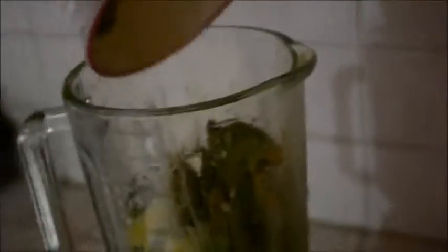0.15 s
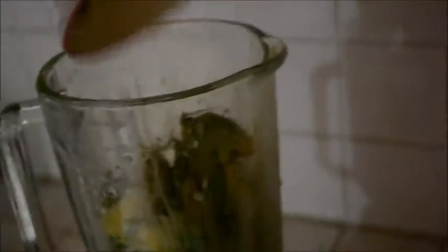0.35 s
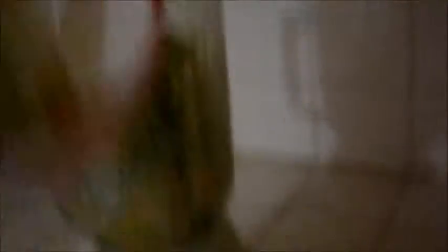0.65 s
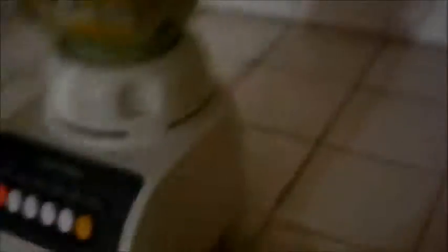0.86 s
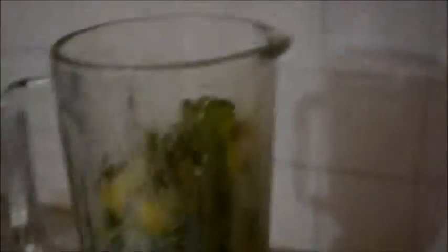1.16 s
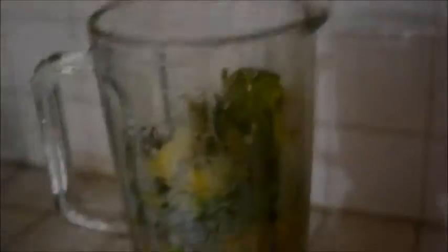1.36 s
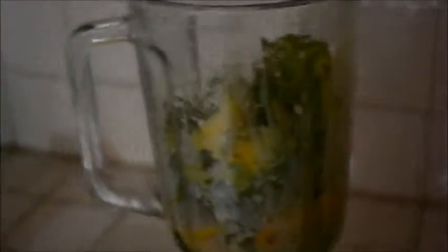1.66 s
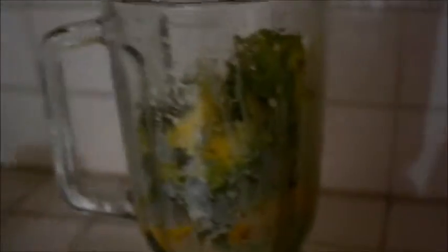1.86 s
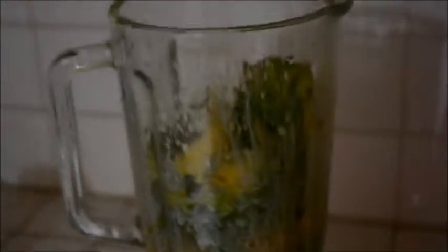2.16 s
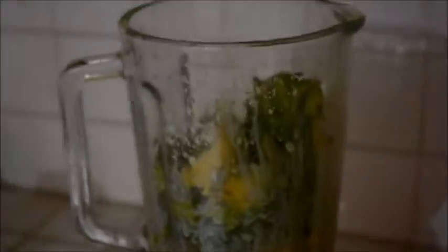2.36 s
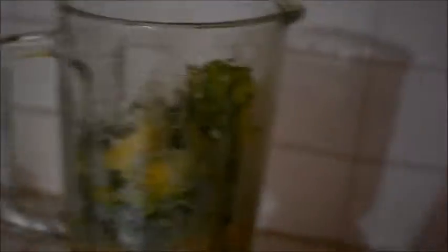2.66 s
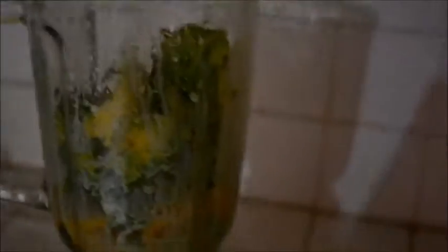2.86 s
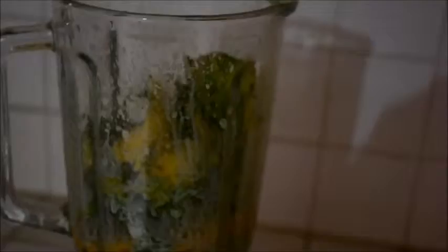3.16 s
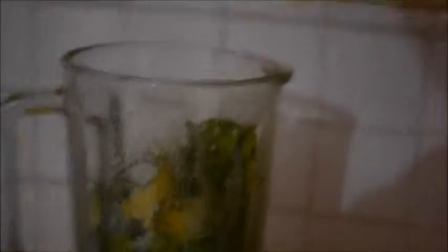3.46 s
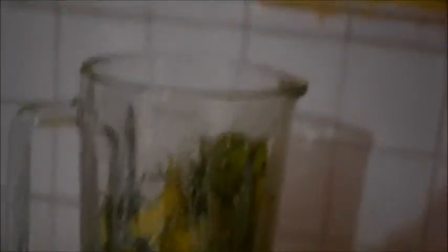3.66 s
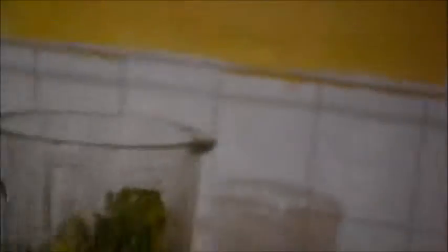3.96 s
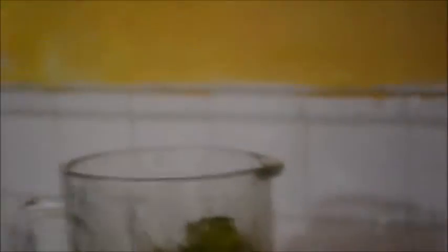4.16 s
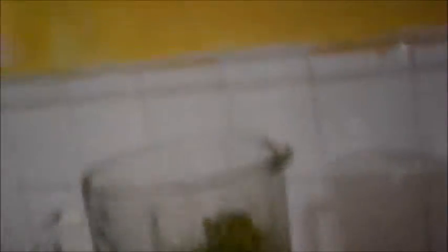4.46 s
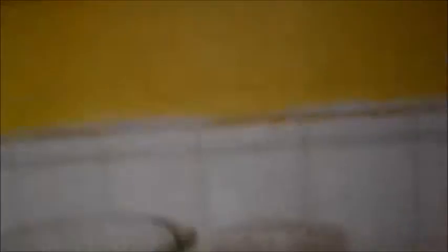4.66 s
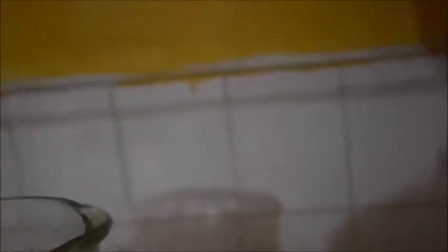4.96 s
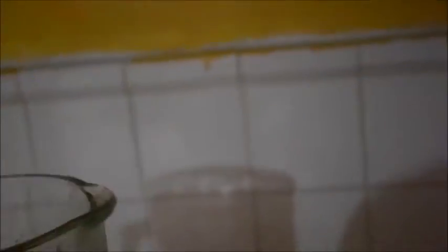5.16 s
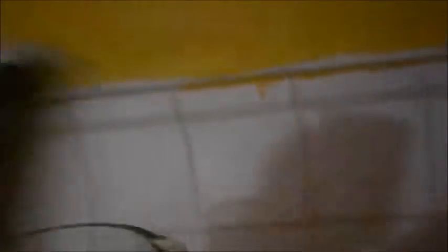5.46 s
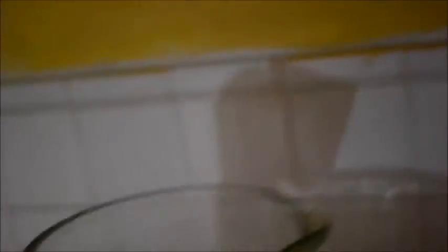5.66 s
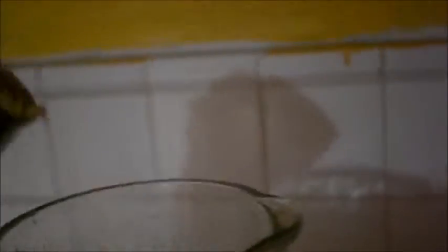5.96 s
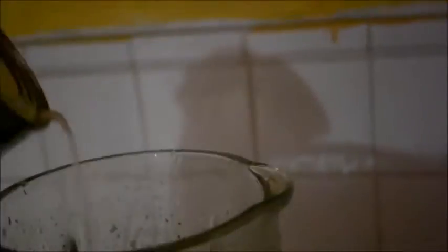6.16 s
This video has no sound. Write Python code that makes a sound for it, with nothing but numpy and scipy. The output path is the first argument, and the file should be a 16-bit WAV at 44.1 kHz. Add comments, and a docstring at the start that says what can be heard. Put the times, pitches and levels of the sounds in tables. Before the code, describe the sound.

A bowl clinks a few times on the rim of a glass blender jar, close to a single microphone. Small clicks, a short slide across the counter and brushes of cloth fill the quiet that follows. Then comes a quick run of glassy knocks and scrapes with two tiny squeaks, trailing off into two faint scrapes. The small kitchen adds a short, hard echo and a low steady hum and hiss.

```python
"""A bowl on the rim of a glass blender jar in a small tiled kitchen, close to a single microphone.
Over faint hum and hiss a sleeve rustles and light taps tick. At 1.1 s the bowl lands and bounces,
ringing the glass. A faint scrape follows, and near 2.5 s more taps as something slides on the counter.
From 4.4 s the bowl knocks and drags at a second place on the rim, squeaking twice as it sticks and slips.
Two soft scrapes end the scene."""
import sys
import numpy as np
from scipy import signal
from scipy.io import wavfile

SR = 44100
rng = np.random.default_rng(int(sys.argv[2]) if len(sys.argv) > 2 else 0)


def persist_wave(psi):
    """Save psi, clipped to +-1, as 16-bit WAV."""
    counts = np.round(np.clip(psi, -1, 1) * 32767).astype(np.int16)
    wavfile.write(sys.argv[1], SR, np.atleast_2d(counts).T)


N = 277830
CUTOFF_HZ = 15900


def from_db(db):
    return 10 ** (np.asarray(db) / 20)


def rms_one(x):
    return x / np.sqrt(np.mean(x ** 2) + 1e-20)


def at_hz(points, hz):
    """Read a table on a log-frequency axis."""
    freqs, values = np.transpose(points)
    return np.interp(np.log(hz), np.log(freqs), values)


def butter(x, hz, kind, order=2):
    return signal.sosfilt(signal.butter(order, hz, kind, fs=SR, output="sos"), x)


def add(out, s, sound):
    """Lay a sound in at s seconds."""
    start = int(round(s * SR))
    out[start:start + len(sound)] += sound[:len(out) - start]


def ring(force, hz, t60):
    """A damped mode: a unit click sets a sine of height 1 ringing."""
    r, w = from_db(-60 / (t60 * SR)), 2 * np.pi * hz / SR
    return signal.lfilter([0, np.sin(w)], [1, -2 * r * np.cos(w), r * r], force + 1e-18)


def wavering_tones(rows):
    """Each tone is noise passed twice through a narrow resonance."""
    out = np.zeros(N)
    for hz, width_hz, db in rows:
        t60 = np.log(1000) / (np.pi * width_hz)
        narrow = ring(rng.standard_normal(N), hz, t60)
        out += from_db(db) * rms_one(ring(narrow, hz, t60))
    return out


def noise_bands(size):
    """White noise as (centre Hz, band) pairs, neighbours unrelated, finer in the treble."""
    edges = np.concatenate([np.geomspace(22, 2000, 16)[:-1], np.geomspace(2000, 17500, 14)])
    white = rng.standard_normal((2, size))
    return [(np.sqrt(lo * hi), butter(white[k % 2], [lo, hi], "band", order=3))
            for k, (lo, hi) in enumerate(zip(edges, edges[1:]))]


def friction(colour, level_db, tilt_db, grain_db, pivot_hz=6000):
    """Fine-grained rubbing noise, tilted by tilt_db per octave about a pivot."""
    bands = [(hz, from_db(at_hz(colour, hz)) * band) for hz, band in noise_bands(N) if hz > colour[0][0]]
    rms = np.sqrt(sum(np.var(band) for hz, band in bands))
    hiss = sum(band * from_db(tilt_db * np.log2(hz / pivot_hz)) for hz, band in bands) / rms
    grain = rms_one(butter(rng.standard_normal(N), 250, "low"))
    return hiss * from_db(level_db + grain_db * grain)


def strokes(rows, rise_share, roundness, end_db=-20):
    """Each stroke's power in time: it swells and fades, end_db down at both ends of its length."""
    t, powers = np.arange(N) / SR, []
    for s, length, db, *_ in rows:
        away = np.maximum((s - t) / rise_share, (t - s) / (1 - rise_share)) / length
        powers.append(from_db(db + end_db * np.minimum(away, 4) ** roundness) ** 2)
    return np.array(powers)


def blend(powers, rows, rest_db, rest_colour):
    """Level in dB and colour in time: strokes add up over a floor, the strongest leading the colour."""
    rest = from_db(rest_db) ** 2
    total = powers.sum(axis=0) + rest
    colours = np.array([row[3] for row in rows])
    return 10 * np.log10(total), (colours @ powers + rest * rest_colour) / total


# Background air at the microphone: f/Hz, relative density/dB
AIR_COLOUR = [(25, -16), (60, -14), (130, -6), (200, -11), (300, -3), (420, -3), (700, -4), (1650, -4),
              (4300, -9), (5500, -16), (8000, -20), (12000, -35), (14000, -32), (16000, -53)]
# Hum and whine in the room: f/Hz, width/Hz, level/dB
ROOM_HUMS = [(158.9, 8.7, -76.5), (414, 48, -76), (4560, 220, -76)]


def room_tone(air_db=-58, rumble_cut_hz=36):
    """Steady hiss, a low wavering hum and a faint whine."""
    air = rms_one(sum(from_db(at_hz(AIR_COLOUR, hz)) * band for hz, band in noise_bands(N)))
    return from_db(air_db) * butter(air, rumble_cut_hz, "high") + wavering_tones(ROOM_HUMS)


# Rubbing noise of cloth, also used for the rim: f/Hz, relative density/dB
RUB_COLOUR = [(300, 2.5), (800, -0.5), (1800, 0), (3000, 4), (4300, 6), (6500, 2), (9500, -0.5),
              (12000, -4.5), (14500, -6)]
# Moves of the arm: peak t/s, length/s, level/dB, tilt/(dB per octave)
ARM_MOVES = [(.53, .1, -73, 8), (.77, .26, -63, 1.5), (0.96, 0.35, -58, 2), (1.121, 0.23, -49.5, 2.5),
             (3.24, 0.29, -69, -6), (3.4, 0.21, -65.5, 0), (3.678, 0.4, -54, 0.8), (3.944, .16, -60.5, -2),
             (4.165, 0.61, -62, 0.5), (4.185, 0.048, -44, 1), (4.211, 0.11, -53.5, 1),
             (4.402, 0.064, -56.5, -3), (4.865, 0.15, -55, -0.5), (5.042, 0.23, -58.5, 2.5),
             (5.254, 0.32, -65, -0.5), (5.497, 0.29, -65, -3)]


def sleeve_rustle():
    """Cloth brushes with each move of the arm and stirs faintly in between."""
    moves = strokes(ARM_MOVES, rise_share=.41, roundness=2.3)
    level_db, tilt_db = blend(moves, ARM_MOVES, rest_db=-74.5, rest_colour=2.5)
    return friction(RUB_COLOUR, level_db, tilt_db, grain_db=1.2)


# Taps near the microphone: t/s, level/dB, f/Hz, t60/s, relative snap/dB
TAPS = [(.9190, -19, 1800, 0.0062, -7), (0.9214, -30.5, 3510, 0.018, -23), (.9730, -37, 3800, 0.006, -3),
        (2.4728, -35, 4540, 0.0063, -15), (2.477, -20, 4370, 0.0071, 5), (2.672, -32, 4130, 0.0075, -12),
        (2.6900, -36, 2010, 0.007, 12), (2.6965, -39, 900, 0.03, -9), (2.7450, -38, 740, 0.012, -2),
        (2.753, -44.5, 690, 0.035, 0), (2.7582, -46, 300, .027, 3), (2.7967, -47.5, 3600, 0.04, 8),
        (3.607, -48, 2160, 0.025, -2), (3.924, -42.5, 750, .016, 11), (4.1660, -38.5, 750, 0.024, -18),
        (4.183, -47, 625, 0.12, 7), (4.3845, -40.5, 2130, 0.03, 5)]


def handling_taps(snap_t60=.0036, snap_band_hz=(1700, 5500), modes=8, detune=.059):
    """Each light tap is a short snap and a cluster of close, damped modes."""
    out, t = np.zeros(N), np.arange(SR // 10) / SR
    for s, db, hz, t60, snap_db in TAPS:
        burst = rng.standard_normal(len(t)) * from_db(-60 * t / snap_t60)
        snap = butter(burst, snap_band_hz, "band", order=1)
        pitches = hz * np.exp(detune * rng.standard_normal(modes))
        signs = rng.choice([-1, 1], size=modes)
        cluster = signs @ np.sin(2 * np.pi * np.outer(pitches, t)) / np.sqrt(modes)
        body = cluster * from_db(-60 * t / t60)
        add(out, s, from_db(db) * (body + from_db(snap_db) * snap))
    return butter(out, 200, "high")


# The bowl lands on the rim:
# t/s, strength/dB, low-mode tilt/(dB per octave), high-mode gain/dB, touches, first gap/s
LANDINGS = [(1.1087, -1.5, -6, -12, 1, 0), (1.1532, -7.5, -.5, 1.5, 5, .0214),
            (1.3078, -4.5, -1, 2, 3, .0085), (4.4725, -19, -7.5, -10, 2, 0.0053),
            (4.5481, -11, -9, -10, 1, 0), (4.5566, -10, -6, -16, 2, .0045),
            (4.5659, -15, 0, -4.5, 2, 0.0039), (4.5843, -27, -11, -14, 1, 0), (4.6516, -25, 7, 0, 1, 0),
            (4.6530, -5, 8, -7.5, 2, 0.00046), (4.6588, -6.5, 8, -3.5, 2, .0039),
            (4.7148, -9.5, 0, -3, 1, 0), (4.7769, -20.5, -10, -6, 2, 0.0025),
            (4.8055, -25, -17.5, -17, 1, 0.017), (4.9120, -41, 0, -10, 1, 0.0092)]


def bounces(rebound=.64, loss_db=1.8, dulling_db=2.5):
    """Every touch of every landing: each bounce comes sooner, weaker and duller than the last."""
    touches = []
    for s, db, tilt_db, high_db, count, gap in LANDINGS:
        for k in range(count):
            touches.append((s, db - k * loss_db, tilt_db, high_db - k * dulling_db))
            s += gap * rebound ** k
    return touches


# Modes of bowl and jar; the broad knock dies at once, the glass sings on:
# f/Hz, gain at the first place on the rim/dB, gain at the second/dB, t60/s
JAR_MODES = [(253, -31, -39.5, 0.015), (544, -31, -35.5, 0.02), (955, -18, -52, 0.01),
             (1412, -11, -14, 0.0084), (1887, -5, -4, 0.011), (2235, -15.5, -24, 0.018),
             (2870, -57, -20.5, 0.013), (3300, -33, -22, 0.0074), (1070, -42, -41, .08),
             (1320, -36, -45, .07), (1401, -33, -46, .15), (1503, -40, -26, .12), (1595, -30, -26, .14),
             (1719, -30, -36, .13), (1778, -33, -26, .16), (1872, -31, -29, .12), (1991, -27, -40, .13),
             (2023, -38, -31, .12), (2146, -35, -37, .15), (2240, -43, -31, .11), (2346, -36, -44, .13),
             (2535, -44, -36, .1), (2663, -39, -45, .12), (2912, -46, -36, .08), (5724, -40, -36, .1),
             (7413, -35, -41, .12), (7543, -37, -38, .1), (5330, -23, -71, 0.023), (5820, -22, -21, 0.054),
             (6500, -32, -20.5, 0.01), (7460, -17, -17, 0.018), (7790, -22.5, -21.5, 0.028),
             (9900, -29, -28, 0.015), (10540, -28, -25, 0.014), (13260, -28.5, -26, 0.012),
             (14200, -35, -37, 0.0059), (14800, -33, -38, .01)]


def bowl_on_jar(drag_db, drag_high_db, slips_per_s=720, second_place_s=3,
                soft_from_hz=1450, pivot_hz=1800, high_from_hz=4500):
    """Knocks and the tiny slips of dragging excite the same modes, each with a strength of its own."""
    s, knock_db, tilt_db, high_db = np.transpose(bounces())
    slips = (rng.random(N) < slips_per_s / SR) * rng.choice([-1, 1], N)
    slips = slips * from_db(drag_db + 4 * rng.standard_normal(N))
    scatter_db = 6 * rng.standard_normal((len(s), len(JAR_MODES)))
    at_first_place = np.arange(N) < second_place_s * SR
    out = np.zeros(N)
    for k, (hz, first_db, second_db, t60) in enumerate(JAR_MODES):
        # a hard, edge-on contact wakes the high modes, a flat one the low
        high = hz > high_from_hz
        treble = np.clip(np.log(hz / soft_from_hz) / np.log(high_from_hz / soft_from_hz), 0, 1)
        colour_db = treble * high_db + (0 if high else tilt_db * np.log2(max(hz / pivot_hz, .5)))
        force = slips * from_db(drag_high_db if high else 0)
        force[np.round(s * SR).astype(int)] += from_db(knock_db + colour_db + scatter_db[:, k])
        force *= from_db(np.where(at_first_place, first_db, second_db))
        skirt = 1.1 if high else 1.784   # band-passed, a mode takes a moment to build up
        out += butter(ring(force, hz, t60), [hz / skirt, min(hz * skirt, CUTOFF_HZ)], "band")
    return butter(out, 400, "high")   # a small body radiates little bass


# The bowl scrapes along the rim: peak t/s, length/s, slip strength/dB, high-mode gain/dB
RIM_DRAGS = [(2.046, .16, -54, -19), (4.399, 0.053, -48, -13), (4.559, 0.14, -32.5, 4.5),
             (4.66, 0.067, -26.5, -6), (4.76, 0.11, -40.5, 5), (4.814, 0.095, -35, -10),
             (5.038, 0.066, -39, -11), (5.493, 0.19, -51.5, -16), (5.762, 0.14, -54, -18)]


def rim_drag():
    """Each scrape swells and fades: slip strength and high-mode gain in time, both in dB."""
    powers = strokes(RIM_DRAGS, rise_share=.6, roundness=1.12)
    return blend(powers, RIM_DRAGS, rest_db=-100, rest_colour=-10)


def rim_hiss(drag_db, drag_high_db, relative_db=-15.5):
    """The scraping edge hisses, the more so the harder it bites."""
    return friction(RUB_COLOUR, drag_db + drag_high_db + relative_db, tilt_db=6, grain_db=3)


# Rubbing noise of the counter: f/Hz, relative density/dB
COUNTER_COLOUR = [(600, -3.5), (1300, -9), (2700, -8.5), (4200, 3.5), (5500, -3), (7500, -6.5),
                  (10000, -14.5), (12000, -19), (14500, -17)]
# Pushes across the counter: peak t/s, length/s, level/dB
PUSHES = [(2.493, 0.019, -45.5), (2.612, 0.13, -49), (2.755, 0.041, -60)]


def counter_slide():
    """Something smooth rasps a little as it is pushed across the counter."""
    power = strokes(PUSHES, rise_share=.51, roundness=3.6).sum(axis=0)
    return friction(COUNTER_COLOUR, 10 * np.log10(power + 1e-18), tilt_db=0, grain_db=1.5)


# A thin chirp, then a fuller groan: peak t/s, half length/s, tones as (f/Hz, width/Hz, level/dB)
RIM_SQUEAKS = [(4.527, 0.014, [(6060, 700, -47), (7800, 300, -39.5), (14700, 500, -50)]),
               (5.034, 0.014, [(910, 250, -53), (1915, 42, -39), (2090, 340, -48.5), (2910, 140, -55.5),
               (5120, 65, -62), (6350, 510, -65), (6840, 130, -56.5)])]


def rim_squeaks():
    """The rim sticks and slips, swelling into brief rough tones."""
    t = np.arange(N) / SR
    return sum(np.exp(-.5 * ((t - s) / half) ** 2) * wavering_tones(tones)
               for s, half, tones in RIM_SQUEAKS)


# Counter and tiled wall close by: delay/s, gain
NEAR_ECHOES = [(.0022, .33), (.00505, .25), (.0079, .1), (.0125, .08)]
# Decay of the kitchen: f/Hz, t60/s
TAIL_T60 = [(300, 0.1), (2000, 0.32), (7500, 0.23), (14000, 0.33)]
# Reverberation against the direct sound at the microphone: f/Hz, level/dB
TAIL_LEVEL = [(300, -4.5), (2000, -5.5), (7500, -6), (14000, -9.5)]


def kitchen(x, build_s=.0016):
    """Hard surfaces return a few near echoes and a short diffuse tail that dies soonest in the bass."""
    t, response = np.arange(SR // 2) / SR, 0
    for hz, band in noise_bands(len(t)):
        fade = from_db(-60 * t / at_hz(TAIL_T60, hz)) * (1 - np.exp(-t / build_s))
        response = response + from_db(at_hz(TAIL_LEVEL, hz)) * band * fade / np.linalg.norm(fade)
    for delay, gain in NEAR_ECHOES:
        add(response, delay, np.array([gain]))
    return signal.fftconvolve(x, response)[:N]


def scene(tap_send_db=-7):
    """One microphone position: the taps are nearer and so drier than the jar."""
    drag_db, drag_high_db = rim_drag()
    jar = bowl_on_jar(drag_db, drag_high_db) + rim_squeaks()
    taps = handling_taps()
    room = kitchen(jar + from_db(tap_send_db) * taps)
    rubbing = rim_hiss(drag_db, drag_high_db) + sleeve_rustle() + counter_slide()
    return (jar + taps + room + rubbing + room_tone())[None]


def record(dry):
    """The microphone's signal is cut steeply at the top."""
    lowpass = signal.ellip(10, .2, 70, CUTOFF_HZ, fs=SR, output="sos")
    return signal.sosfilt(lowpass, dry)


dry = scene()
out = record(dry)
persist_wave(out)
```